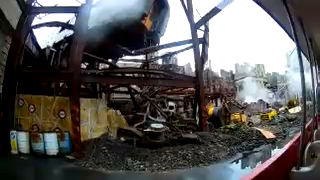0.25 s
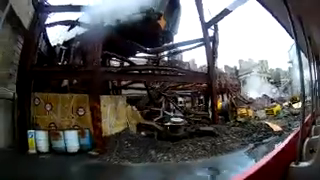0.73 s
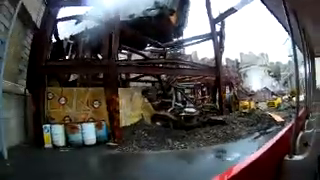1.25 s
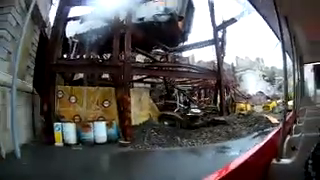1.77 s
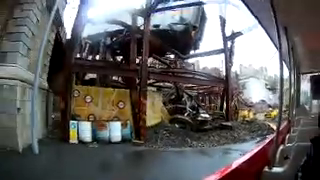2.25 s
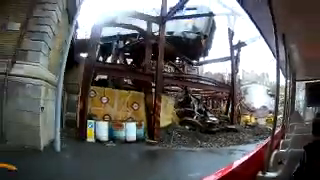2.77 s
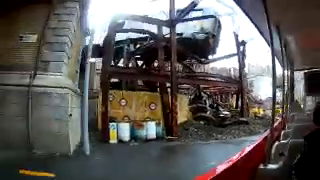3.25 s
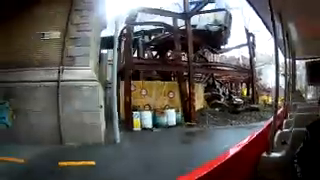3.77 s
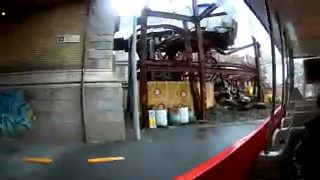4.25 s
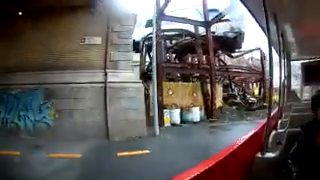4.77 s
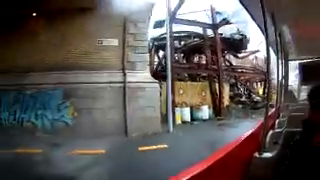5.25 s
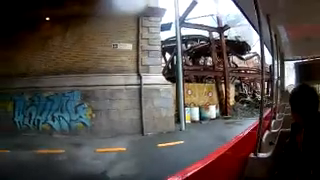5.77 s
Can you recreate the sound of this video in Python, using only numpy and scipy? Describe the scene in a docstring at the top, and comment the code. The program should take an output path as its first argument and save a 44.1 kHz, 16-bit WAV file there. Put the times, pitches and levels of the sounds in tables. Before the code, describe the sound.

An open tour tram rolls slowly over wet asphalt, its low engine hum swelling and sinking, with airy hisses and a rumbling run of jolts.

```python
"""Tour tram on wet asphalt

An open tour tram rolls slowly over wet asphalt, heard from a seat on board.
The engine, its drones and a deep throb are wavering tones; the faint whines are fuzzy, narrow tones.
Tyre wash, spray and rumble are coloured noise, and narrow bands of noise make the booms and growl.
A hiss dies away at the start and others, short or long, follow; a thin whistle sinks in pitch.
A run of jolts, made of dying low tones, shakes the frame on a rough patch."""
import sys
import numpy as np
from scipy import signal
from scipy.fft import rfft, irfft, next_fast_len
from scipy.io import wavfile
from scipy.ndimage import uniform_filter1d

SR = 44100
rng = np.random.default_rng(int(sys.argv[2]) if len(sys.argv) > 2 else 0)


def unload_wav(signal):
    """Save mono or channel-first audio to the path in sys.argv[1] as 16-bit WAV at rate SR, clipped to [-1, 1]."""
    wavfile.write(
        sys.argv[1],
        SR,
        np.round(np.clip(np.atleast_2d(signal).T, -1, 1) * 32767).astype(np.int16),
    )


N = 265482
TIME = np.arange(N) / SR  # seconds


def gain_of(db):
    """Turns decibels into a factor."""
    return 10 ** (np.asarray(db) / 20)


def evened(x):
    """Scales a sound to an rms (average strength) of 1."""
    return x / np.sqrt(np.mean(x ** 2) + 1e-20)


def curves(rows):
    """Joins each column of a table by straight lines in time."""
    s, *columns = np.transpose(rows)
    return [np.interp(TIME, s, c) for c in columns]


def swell(start, end, flatness=2):
    """Rises from nothing to a rounded top and falls again; more flatness holds it nearer to 1."""
    arch = np.sin(np.pi * np.clip((TIME - start) / (end - start), 0, 1))
    return np.tanh(flatness * arch) ** 2


def die_away(t, t60):
    """Stays at 1 until t = 0, then falls by 60 dB in t60 seconds."""
    return np.exp(-np.log(1000) * np.maximum(t, 0) / t60)


def noise(points):
    """Noise of rms 1, coloured by (pitch, level) points and silent above the last."""
    f, db = np.transpose(points)
    size = next_fast_len(N)
    hz = np.fft.rfftfreq(size, 1 / SR)
    level_db = np.interp(np.log(hz + 1), np.log(f + 1), db)
    gain = gain_of(level_db) * (hz < f[-1])
    spectrum = rfft(rng.standard_normal(size)) * gain
    return evened(irfft(spectrum, size)[:N])


def drift(rate_hz):
    """Random wandering of rms 1; a higher rate makes it quicker."""
    hz = np.fft.rfftfreq(N, 1 / SR)
    hz = hz[hz < 1500]
    random_parts = rng.standard_normal(len(hz)) + 1j * rng.standard_normal(len(hz))
    parts = random_parts * np.exp(-(hz / rate_hz) ** 2) * (hz > 0)
    return evened(irfft(parts, next_fast_len(N, True))[:N])


def steadied(x, span_s):
    """Takes the slow chance swells out of a noise and keeps its quick flutter."""
    size = max(int(span_s * SR), 2)
    slow_power = uniform_filter1d(uniform_filter1d(x ** 2, size), size)
    return evened(x / np.sqrt(slow_power + 1e-6))


def angle(hz):
    """Running phase of a pitch curve, from a random start."""
    return 2 * np.pi * (np.cumsum(hz * np.ones(N)) / SR + rng.random())


def tone(hz, flutter_db, rate_hz):
    """A clean tone of rms about 1 whose level flutters."""
    return np.sqrt(2) * gain_of(flutter_db * drift(rate_hz)) * np.sin(angle(hz))


def fuzzy_tone(hz, width_hz):
    """A narrow band of noise: two random drifts carried on one pitch."""
    phase = angle(hz)
    return evened(drift(width_hz) * np.cos(phase) + drift(width_hz) * np.sin(phase))


def engine(waver=.0015, rough_hz=137, rough_width_hz=20, rough_db=-38.5, rough_fade_db_per_s=0.5):
    """A clean hum that swells and sinks, with a rough edge that slowly smooths out."""
    # engine speed: (time [s], pitch of the main hum before its waver [Hz])
    speed = [(0, 140.7), (1.8, 143.1), (2.5, 139.6), (3.4, 141.7), (4, 140.4), (5.1, 139), (6.02, 138.1)]
    # hum swells in the carriage: (start [s], end [s], level before swell shaping [dB])
    hum_swells = [(-.3, 1.6, -28.5), (1.2, 2.43, -26), (3.35, 4.7, -26), (4.85, 6.2, -26.5)]
    hz = curves(speed)[0] * (1 + waver * drift(8))
    level = gain_of(-36)  # dB, level between swells
    for start, end, db in hum_swells:
        level = np.hypot(level, gain_of(db) * swell(start, end, flatness=1.43))
    edge_level = gain_of(rough_db - rough_fade_db_per_s * TIME)
    edge = edge_level * steadied(fuzzy_tone(rough_hz, rough_width_hz), 0.05)
    return level * tone(hz, flutter_db=0.4, rate_hz=9.3) + edge


def drone():
    """Other clean, low drones swell and fade beside the hum."""
    # drones: (start [s], end [s], pitch [Hz], level before swell shaping [dB])
    drones = [(-.1, 0.416, 201, -33), (-.1, 0.601, 237, -39.5), (.6, 1.2, 233, -35.5),
              (0.823, 1.152, 175, -36.5), (1.55, 2.201, 235, -32.5), (3.297, 4.804, 219, -42),
              (5.15, 5.95, 102.2, -30.5), (5.148, 5.606, 205, -33)]
    out = np.zeros(N)
    for start, end, hz, db in drones:
        out += gain_of(db) * swell(start, end) * tone(hz, flutter_db=0.7, rate_hz=10)
    return out


def throb():
    """The shaft throbs through the frame: a deep, unsteady tone whose pitch wanders slowly."""
    # throb: (time [s], pitch [Hz], level before flutter [dB])
    throb_points = [(.1, 52.3, -33.5), (.55, 46.1, -31.5), (1.25, 41.7, -35.5), (1.7, 45.1, -31),
                    (2.15, 51, -26.5), (2.5, 52, -34.5), (3.5, 54, -29.5), (4.5, 51, -29.5), (5.5, 47, -38)]
    hz, db = curves(throb_points)
    return gain_of(db) * tone(hz, flutter_db=2.5, rate_hz=8.3)


def whines(level_db=-1, width_hz=4, width_share=0.011):
    """Narrow, unsteady tones from the drive and the ringing bodywork; higher ones are wider."""
    # whines: (start [s], end [s], pitch midway [Hz], glide [Hz per s],
    #          level before level_db and swell shaping [dB])
    whine_rows = [(-.45, 3.2, 608, 4, -43), (-.27, .6, 980, 0, -43.5), (.1, 0.86, 1129, -1.5, -47),
                  (.6, 1.73, 2050, 90, -52.5), (.65, 0.99, 4000, 0.5, -65), (1.4, 2.27, 1114, 2, -49),
                  (1.5, 2.5, 908, 2, -44), (2.3, 3.5, 820, -11, -49), (2.6, 3.7, 430, -13.5, -43.5),
                  (2.499, 4.1, 514.6, -8.5, -43), (3.8, 4.15, 4013, 1.5, -65), (4.2, 5.4, 488, -7, -46),
                  (4.2, 4.8, 790, -15, -46), (4.6, 5.8, 2383, 0, -59), (5.55, 7.3, 1335, 0.5, -46),
                  (5.55, 6.4, 374, -0.5, -41.5), (5.6, 6.4, 469, 6.5, -42.5)]
    out = np.zeros(N)
    for start, end, hz, glide, db in whine_rows:
        pitch = hz + glide * (TIME - (start + end) / 2)
        whine = steadied(fuzzy_tone(pitch, width_hz + width_share * hz), 0.32)
        out += gain_of(db + level_db) * swell(start, end, flatness=3.4) * whine
    return out


def carriage(floor_hz=94, floor_width_hz=14, floor_db=-34.5):
    """The road shakes the frame and the floor all the time, and panels boom over rougher stretches."""
    # colour of the rumble: (pitch [Hz], relative level [dB per Hz])
    rumble_colour = [(10, -29.5), (24, -8.5), (36, 0), (52, -2), (70, 1), (88, -16.5), (130, -22),
                     (300, -45)]
    # strength of the rumble: (time [s], level [dB])
    rumble_strength = [(0, -33.5), (1.3, -33.5), (2, -29), (3.45, -30), (3.65, -25), (4.7, -26),
                       (5.1, -35.5), (5.45, -33), (6.02, -27)]
    # panel booms: (start [s], end [s], panel pitch [Hz], level before swell shaping [dB])
    booms = [(0.102, 1.1, 88, -34.5), (-.1, 1.2, 300, -38), (1.879, 2.223, 133, -25),
             (2.05, 2.602, 234, -37.5), (2.3, 2.668, 91.2, -24), (2.317, 2.635, 138.9, -25),
             (2.545, 3.5, 182, -33), (2.84, 3.026, 95.8, -24.5), (3, 3.65, 259, -38),
             (3.069, 3.36, 90, -23), (3.294, 3.557, 102.5, -26.5), (3.533, 3.864, 95.4, -21),
             (4.142, 4.36, 94.8, -26.5), (4.252, 4.381, 190, -32.5), (5.756, 6.1, 195, -35)]
    boom_width = 0.089  # width of a panel's resonance as a share of its pitch
    out = gain_of(curves(rumble_strength)[0]) * steadied(noise(rumble_colour), .35)
    out += gain_of(floor_db) * steadied(fuzzy_tone(floor_hz, floor_width_hz), 0.078)
    for start, end, hz, db in booms:
        boom = steadied(fuzzy_tone(hz, boom_width * hz), .06)
        out += gain_of(db) * swell(start, end, flatness=2.08) * boom
    return out


def tyres(patchy_db=.5, split_hz=1500):
    """A dull wash with a separately wavering top, and fine spray off the wet road; all slowly recede."""
    # tyres on the wet road: (pitch [Hz], relative level [dB per Hz])
    road_colour = [(130, -9), (250, -0.5), (340, -0.5), (450, -0.5), (560, -1.5), (700, -3.5), (1080, -4.5),
                   (1500, -9.5), (1850, -14.5), (2150, -15.5), (2600, -25.5), (3200, -37), (5000, -58.5),
                   (8000, -73)]
    # fine spray: (pitch [Hz], relative level [dB per Hz])
    spray_colour = [(1500, -5.5), (3200, -5), (3950, 0.5), (4500, -2.5), (5200, -9), (5750, -2),
                    (6400, -12), (7300, -16), (8000, -26)]
    # starting levels in dB, fades in dB per second
    wash_db, wash_fade = -32, 0.209
    top_db, top_fade = -44, 0.5
    spray_db, spray_fade = -56.5, 0.18
    wash = noise(road_colour)
    body = signal.sosfiltfilt(signal.butter(4, split_hz, fs=SR, output="sos"), wash)
    top = wash - body
    out = gain_of(wash_db - wash_fade * TIME + patchy_db * drift(3.9)) * evened(body)
    out += gain_of(top_db - top_fade * TIME + patchy_db * drift(11.0)) * evened(top)
    spray_level = gain_of(spray_db - spray_fade * TIME + patchy_db * drift(14))
    return out + spray_level * noise(spray_colour)


def tread(growl_hz=200, width_hz=72, growl_db=-36, hollow_hz=315, hollow_width_hz=70, hollow_db=-49):
    """The tread growls on the road and stirs a hollow resonance of the carriage."""
    growl = gain_of(growl_db) * steadied(fuzzy_tone(growl_hz, width_hz), 0.076)
    return growl + gain_of(hollow_db) * fuzzy_tone(hollow_hz, hollow_width_hz)


def sizzle(centre_hz=6450, width_hz=420, level_db=-77, growth_db_per_s=1.07, patchy_db=2.5):
    """A bright, flickering band of noise near 6.5 kHz slowly grows, over a faint steady hiss."""
    # steady high hiss: (pitch [Hz], relative level [dB per Hz])
    air_colour = [(7900, -8), (8600, 5), (9300, 2.5), (10500, 2), (12400, -1), (16000, 0)]
    air_db = -78
    level = gain_of(level_db + growth_db_per_s * TIME + patchy_db * drift(20))
    return level * fuzzy_tone(centre_hz, width_hz) + gain_of(air_db) * noise(air_colour)


def hisses():
    """Bursts of broad hiss rise in a straight line and die away."""
    # bursts: (time of the peak [s], rise [s], time to fall 60 dB [s], level [dB])
    bursts = [(.15, 0.35, 0.8, -37.5), (.81, .04, 0.02, -38.5), (1.06, .08, 4.1, -47),
              (2.86, .08, 0.84, -50.5), (3.98, .1, 0.5, -45.5)]
    # their colour: (pitch [Hz], relative level [dB per Hz])
    hiss_colour = [(500, -16), (1000, -2.5), (1500, 2.5), (2100, 0), (2700, -11.5), (3300, -24.5),
                   (4100, -14), (5200, -30.5), (7000, -36), (8000, -46)]
    level = np.zeros(N)
    for peak, rise, t60, db in bursts:
        t = TIME - peak
        level += gain_of(db) * np.clip(1 + t / rise, 0, 1) * die_away(t, t60)
    return level * noise(hiss_colour)


def whistle(start=2.0, end=4.2, top_hz=4290, sag_hz_per_s=490, width_hz=35, level_db=-63,
            fade_db_per_s=5):
    """A thin, fuzzy whistle swells, then fades as it sinks steadily in pitch."""
    t = TIME - start
    level = gain_of(level_db - fade_db_per_s * t) * swell(start, end)
    return level * fuzzy_tone(top_hz - sag_hz_per_s * t, width_hz)


def shudder(detune=0.046):
    """Each jolt builds up in the low modes of the frame, which then die away quickly."""
    # jolts from a rough patch of road: (time the jolt starts [s], level before the mode levels [dB])
    jolts = [(3.545, -17.5), (3.59, -14.5), (3.688, -12.5), (3.734, -16), (3.825, -11.5), (3.926, -16),
             (3.974, -17), (4.059, -15.5), (4.139, -17.5)]
    # low modes of the frame: (pitch before random detuning [Hz], relative level [dB])
    frame = [(37.02, -1.5), (54.06, -1.5), (69.8, -12.5)]
    rise_s, t60_s = 0.0246, 0.34  # build-up, then time to fall 60 dB
    out = np.zeros(N)
    chances = rng.standard_normal((len(jolts), len(frame)))
    for (start, db), chance in zip(jolts, chances):
        t = TIME - start - rise_s  # zero at the peak
        ring = np.zeros(N)
        for (hz, mode_db), c in zip(frame, chance):
            ring += gain_of(mode_db) * np.sin(2 * np.pi * hz * (1 + detune * c) * t)
        out += gain_of(db) * np.clip(1 + t / rise_s, 0, 1) * die_away(t, t60_s) * ring
    return out


def scene():
    """Adds up everything heard from the seat, in one channel."""
    drive = engine() + drone() + throb() + whines()
    rolling = carriage() + tyres() + tread() + shudder()
    return (drive + rolling + sizzle() + hisses() + whistle())[None]


def record(dry):
    """Smooths the very start and end, and cuts the treble above an upper edge."""
    edge_hz = 15750
    faded = dry * signal.windows.tukey(N, .0004)
    low_pass = signal.firwin(511, edge_hz, window=("kaiser", 9), fs=SR)
    return signal.oaconvolve(faded, low_pass[None], "same")


dry = scene()
out = record(dry)
unload_wav(out)
```